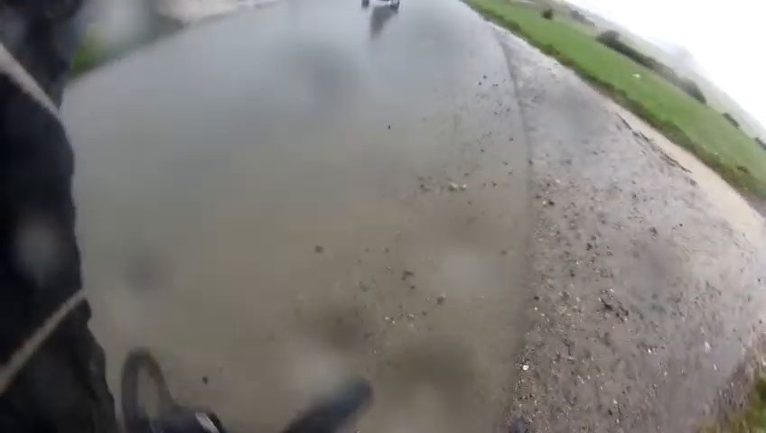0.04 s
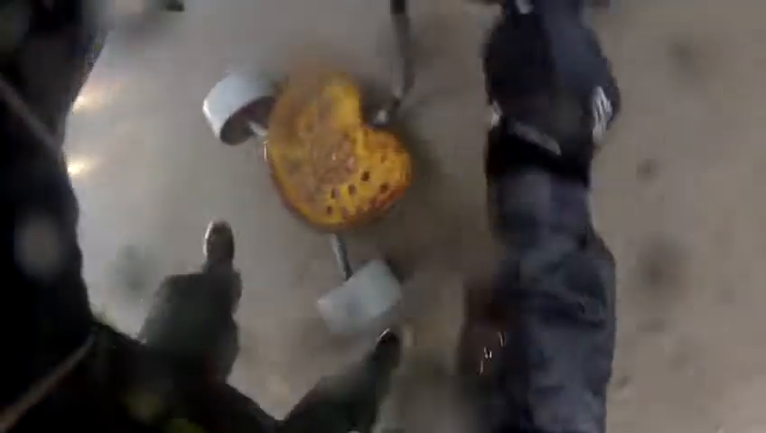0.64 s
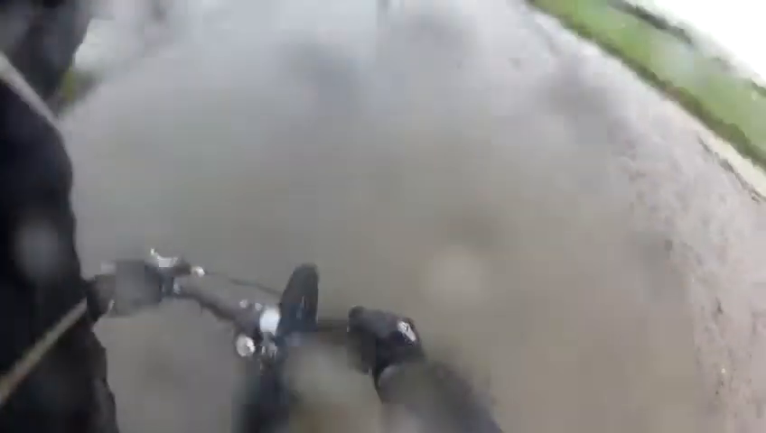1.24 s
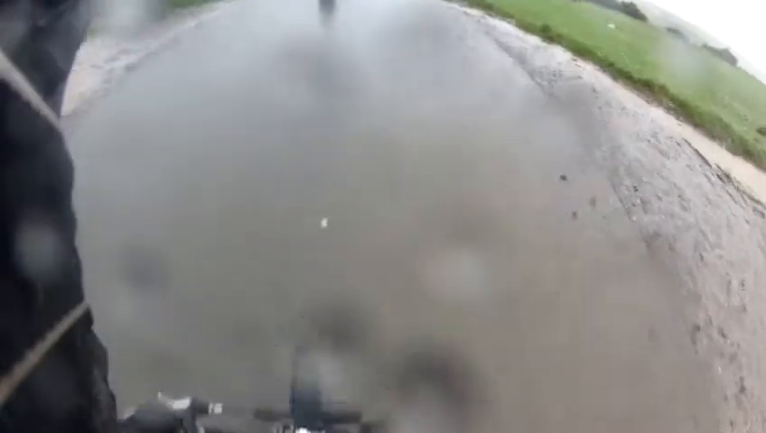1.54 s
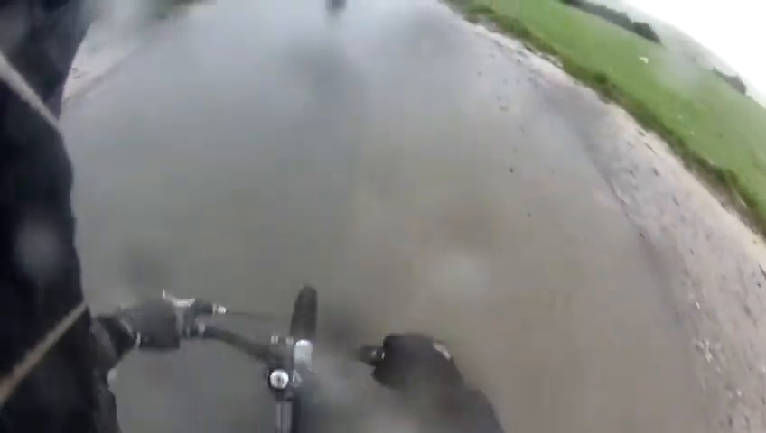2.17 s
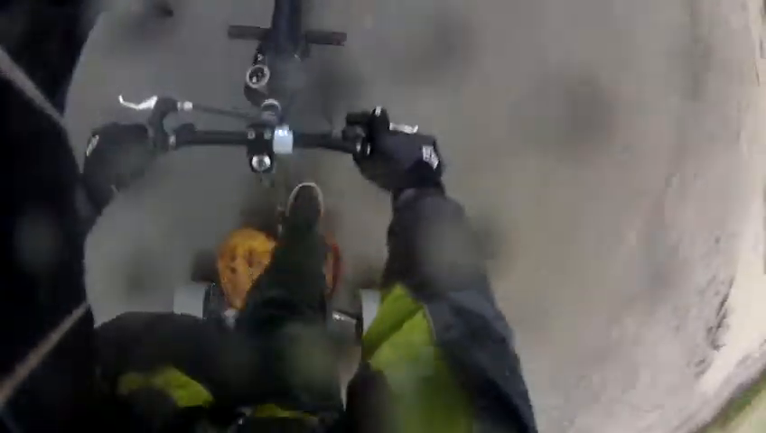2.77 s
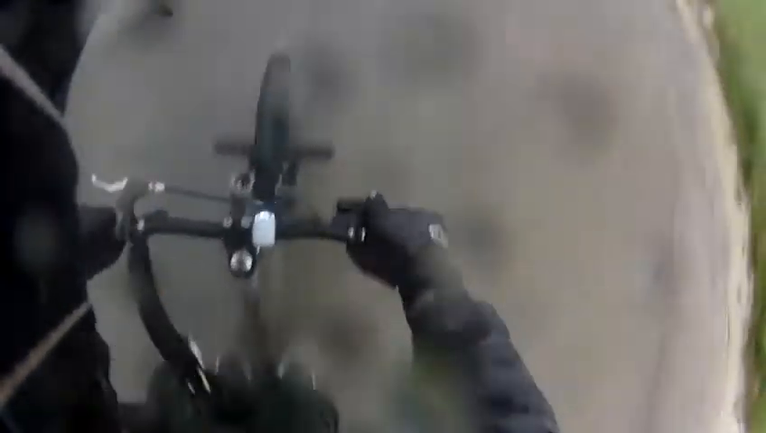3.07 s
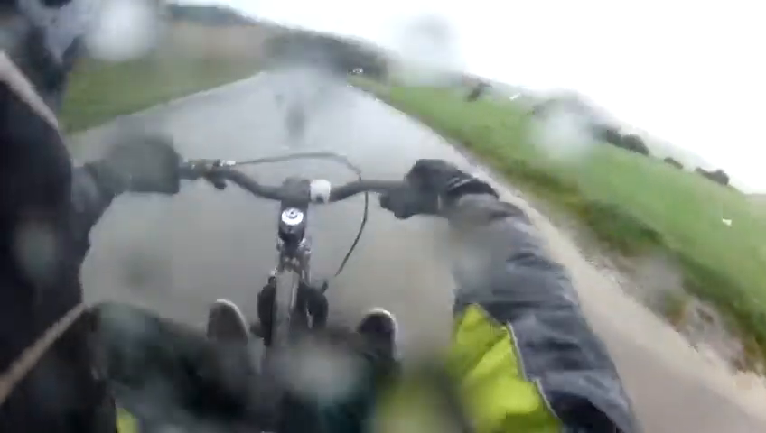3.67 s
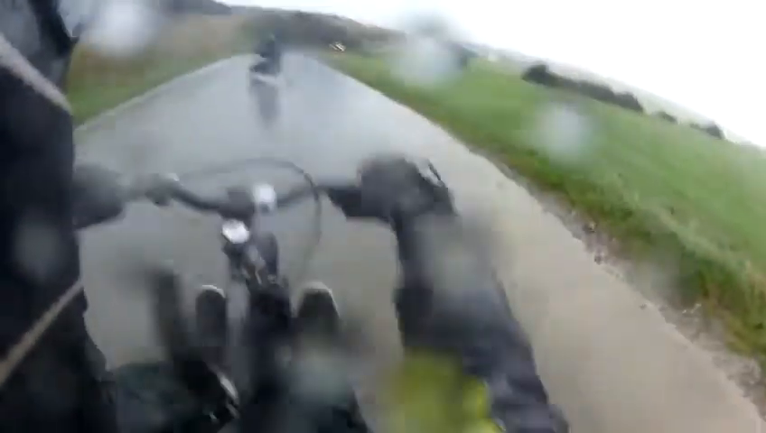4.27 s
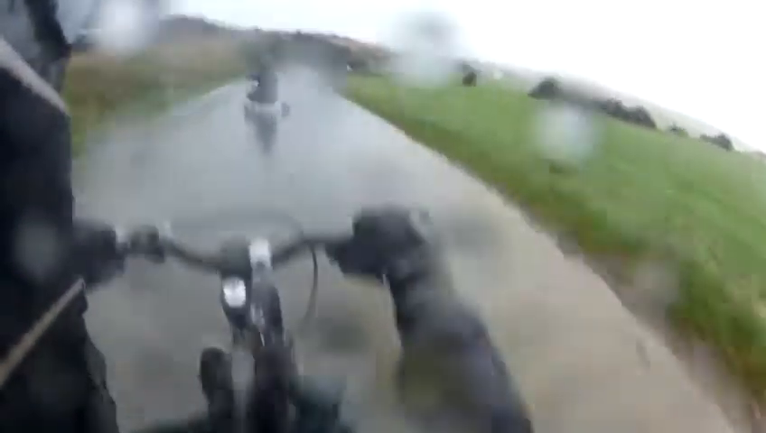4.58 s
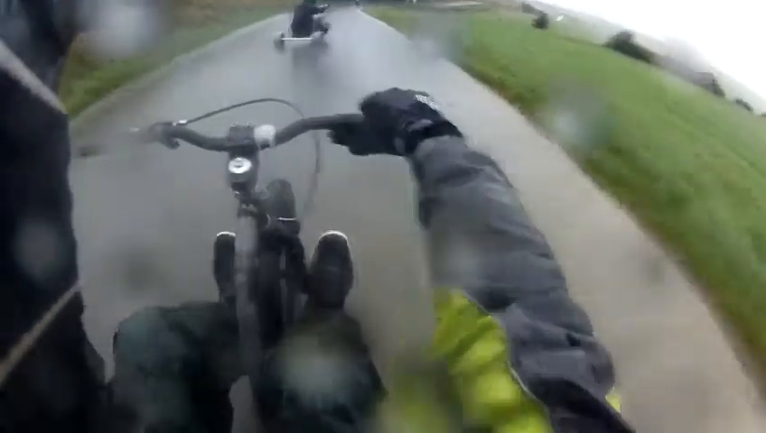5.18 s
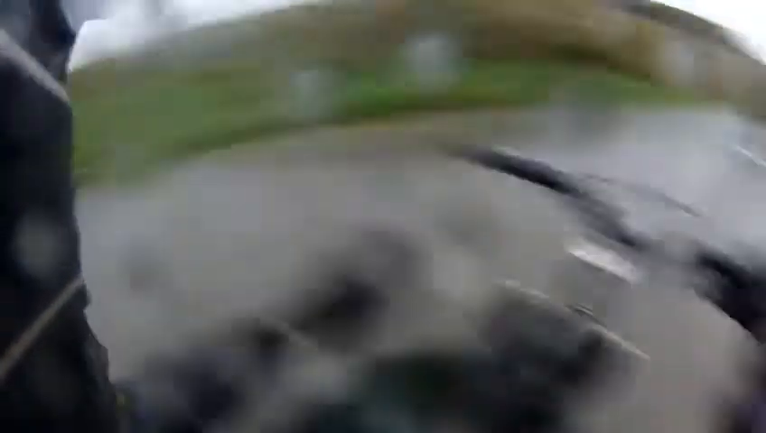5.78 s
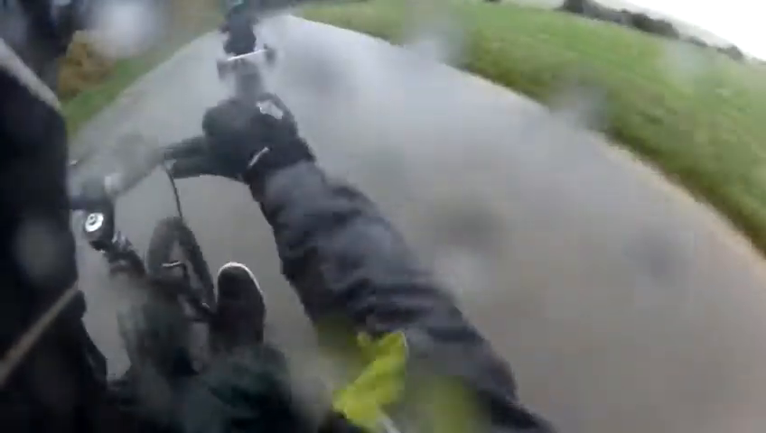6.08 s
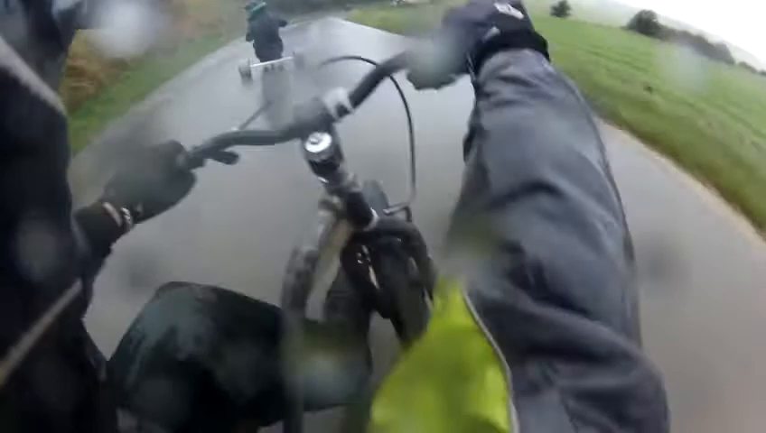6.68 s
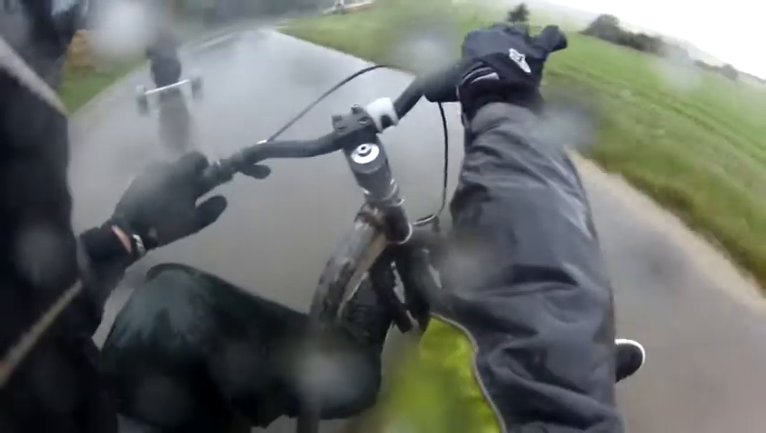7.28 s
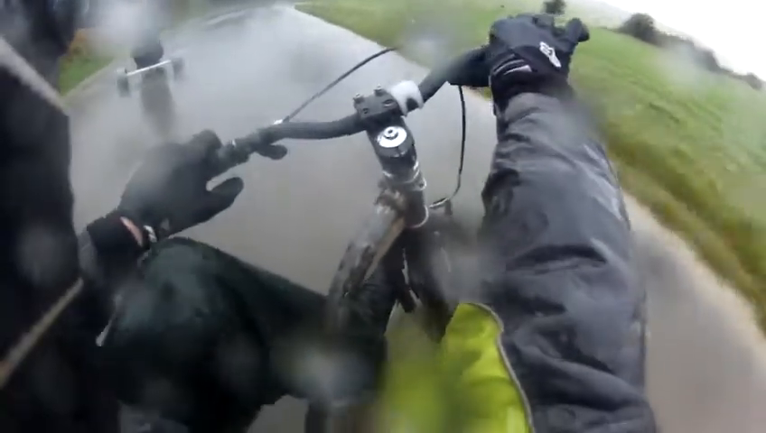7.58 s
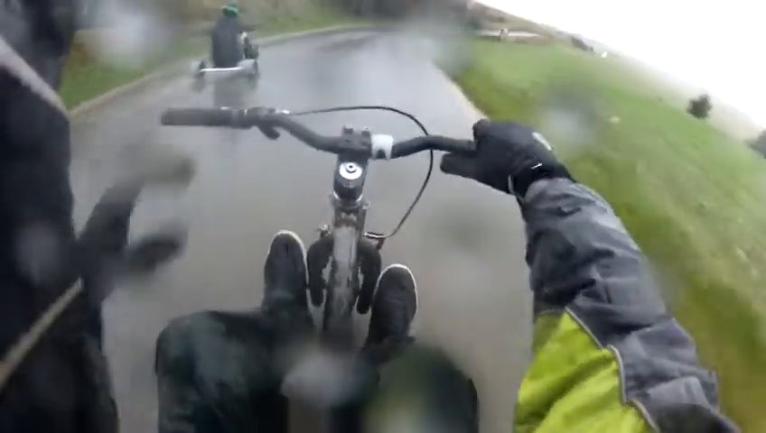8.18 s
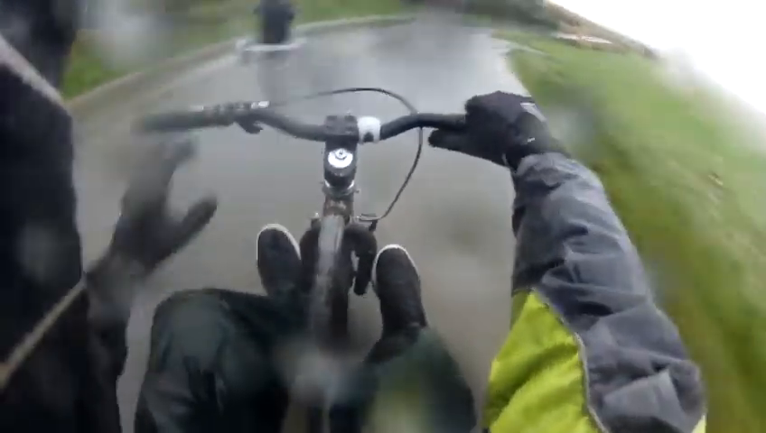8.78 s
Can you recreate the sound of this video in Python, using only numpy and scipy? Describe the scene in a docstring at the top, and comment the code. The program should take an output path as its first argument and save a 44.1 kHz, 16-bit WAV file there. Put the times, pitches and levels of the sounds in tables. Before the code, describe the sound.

A drift trike coasts on wet asphalt, heard from a camera worn by the rider. A quiet, uneven wheel rumble, low wind buffeting and light tyre hiss run throughout, with faint pattering drops. At about 0.4 seconds the wet camera case squeaks, then gives a sharp click and bump. Spray brightens briefly, a rain jacket rustles near 1 second, and another squeak comes at 1.2, followed by small clicks until 2. Around 3.8 seconds squeaks and bumps surround the loudest click. The wheels drum over a rough patch just after 4. A sharp cluster of clicks lands at about 5.5 seconds, with wind gusts from 5.3 to 6. From 6.3 to 7.8 the rear wheels slide, throwing a brighter hiss of spray. After 8 seconds come another gust, a soft bump and several short jacket rustles as the trike rolls on.

```python
"""Wind buffets the microphone over wheels drumming and hissing on wet asphalt: a drift trike coasting,
heard from the seat, through a camera worn by the rider in a waterproof case.
Just below, the tyres tear the water film and throw brighter spray when the rear wheels slide.
Right at the microphone, as the rider shifts, the wet case clicks, bumps and squeaks against mount and
clothing, and a rain jacket rustles. Under it all lie the camera's own faint hiss and whine."""
import sys
import numpy as np
from scipy import signal
from scipy.fft import rfft, irfft, next_fast_len
from scipy.io import wavfile

SR = 44100
rng = np.random.default_rng(int(sys.argv[2]) if len(sys.argv) > 2 else 0)


def waveform_to_disk(signal):
    """Save audio, clipped to [-1, 1], as 16-bit WAV at the path in sys.argv[1]."""
    frames = np.transpose(np.atleast_2d(signal))
    scaled = np.clip(frames, -1, 1) * 32767
    samples = np.round(scaled).astype(np.int16)
    wavfile.write(sys.argv[1], SR, samples)


N = 398223
TIME = np.arange(N) / SR
CUTOFF_HZ = 15500


def from_db(db):
    """Decibels to gain."""
    return 10 ** (np.asarray(db) / 20)


def rms_one(x):
    """Scale to unit rms."""
    return x / np.sqrt(np.mean(x ** 2) + 1e-20)


def in_time(rows):
    """A curve of (time, value) rows at every sample."""
    return np.interp(TIME, *np.transpose(rows))


def add(out, s, sound):
    """Mix a short sound in at time s."""
    i = max(round(s * SR), 0)
    out[i:i + len(sound)] += sound[:N - i]


def envelope(t, length_s, attack_s, release_s):
    """Rise, hold and fall, as a gain."""
    return np.clip(np.minimum(t / attack_s, (length_s - t) / release_s), 0, 1)


def swell(s, half_width_s):
    """A smooth rise and fall around time s, as a gain."""
    return np.exp(-.5 * np.minimum(((TIME - s) / half_width_s) ** 2, 100))


def drift(rate, size=N):
    """Smooth chance with spread 1 that changes about rate times a second."""
    padded = next_fast_len(size)
    hz = np.fft.rfftfreq(padded, 1 / SR)
    slow = irfft(rfft(rng.standard_normal(padded)) / (1 + (hz / rate) ** 2))
    return rms_one(np.resize(slow, size))


def coloured(x, spectrum):
    """Give x a spectrum that falls 20 dB an octave beyond its ends; rms 1."""
    hz, db = np.transpose(spectrum)
    size = next_fast_len(len(x), True)
    octave, points = np.log2(np.fft.rfftfreq(size, 1 / SR) + 1), np.log2(hz)
    beyond = np.abs(octave - np.clip(octave, points[0], points[-1]))
    gain = from_db(np.interp(octave, points, db) - 20 * beyond)
    return rms_one(irfft(rfft(x, size) * gain, size)[:len(x)])


def grains(per_s, spread_db):
    """Tiny impacts at random times, a few much larger than the rest."""
    sizes = from_db(spread_db * np.minimum(rng.exponential(1, N), 4))
    signs = rng.choice([-1, 1], N)
    return rms_one(sizes * signs * (rng.random(N) < per_s / SR))


def ring(x, hz, t60):
    """A unit click sets a sine of height 1 ringing."""
    r, w = from_db(-60 / (t60 * SR)), 2 * np.pi * hz / SR
    return signal.lfilter([0, np.sin(w)], [1, -2 * r * np.cos(w), r * r], x + 1e-18)


def soften(x, hz):
    """A yielding contact passes little above hz."""
    return signal.sosfilt(signal.butter(2, min(hz, SR / 3), fs=SR, output="sos"), x)


# Headwind on the case, right at the microphone: t/s, relative level/dB
HEADWIND_LEVEL = [(0.0, -56), (1.16, -50), (1.46, -61), (3.49, -64.5), (3.9, -50.5), (4.37, -59),
                  (5.1, -65), (5.31, -54), (6.04, -63), (6.28, -69), (6.99, -59), (7.92, -67),
                  (8.57, -54.5), (9.03, -52)]
# Single gusts on the case: t/s, level/dB
WIND_GUSTS = [(2.22, -50), (2.56, -47.5), (2.95, -48.5), (4.36, -50), (4.86, -51.5), (5.27, -43),
              (5.75, -43.5), (5.92, -42.5), (8.08, -52), (8.38, -41)]
# Wind as heard inside the case: f/Hz, relative level/dB
WIND_SPECTRUM = [(15, 3.5), (35, 0), (70, -11), (110, -10), (200, -31.5)]


def wind(jolts, gain_db, gust_half_width_s):
    """Lumpy air pushes on the case, steadily and in gusts."""
    gusts = sum(from_db(db) * swell(s, gust_half_width_s) for s, db in WIND_GUSTS)
    level = np.hypot(from_db(in_time(HEADWIND_LEVEL) + gain_db), gusts)
    return level * from_db(3.6 * jolts) * coloured(rng.standard_normal(N), WIND_SPECTRUM)


# Wheels on the asphalt, just below the microphone: t/s, relative level/dB
RUMBLE_LEVEL = [(0.0, -61), (0.45, -50.5), (0.85, -46.5), (1.48, -63), (2.11, -54), (2.64, -62),
                (3.22, -59.5), (3.77, -56), (3.92, -49.5), (4.37, -54), (4.53, -48.5), (5.03, -53),
                (5.31, -44.5), (5.71, -57.5), (6.79, -58), (7.04, -50), (7.55, -60.5), (9.03, -46)]
# Rough patches passing under the trike: t/s, half width/s, level/dB
ROUGH_PATCHES = [(0.88, 0.063, -47), (1.97, 0.021, -46), (2.199, 0.053, -43.5), (4.15, 0.034, -36.5),
                 (4.65, 0.032, -46), (7.07, .07, -45), (7.5, 0.04, -50), (8.3, 0.1, -49)]
# The hollow wheels, heard from the seat: f/Hz, relative level/dB
WHEEL_SPECTRUM = [(60, -19), (120, -7), (170, -7), (245, 0.5), (310, -7), (420, -16.5), (600, -25.5),
                  (900, -39.5), (1500, -38)]


def wheel_rumble(jolts, gain_db):
    """Asphalt drums in the hollow wheels, harder over rough patches."""
    patches = sum(from_db(db) * swell(s, half_width_s) for s, half_width_s, db in ROUGH_PATCHES)
    level = np.hypot(from_db(in_time(RUMBLE_LEVEL) + gain_db), patches)
    return level * from_db(3.7 * jolts) * coloured(rng.standard_normal(N), WHEEL_SPECTRUM)


# Water under the tyres, down at road level: t/s, relative level/dB
WATER_LEVEL = [(0.0, -70.5), (0.3, -67), (0.45, -62), (1.11, -56), (1.56, -73), (2.26, -64.5),
               (2.86, -66.5), (3.02, -61), (3.52, -63), (4.05, -60.5), (5.71, -57.5), (6.26, -60.5),
               (6.54, -53.5), (7.29, -54.5), (7.92, -56), (8.3, -53), (8.7, -55), (9.03, -53.5)]
# Rear wheels sliding, close behind the rider: start/s, end/s, extra spray/dB
REAR_SLIDES = [(0.548, 1.2, 4), (6.267, 7.75, 5.5)]
# Tyre hiss, heard from the seat: f/Hz, relative level/dB
TYRE_SPECTRUM = [(700, -17.5), (1250, -13), (1600, -6.5), (1900, 1.5), (2100, 0), (2550, 2), (2900, -2),
                 (3400, -0.5), (3900, -5), (4600, -19.5), (6000, -29)]
# Fine spray off the wheels: f/Hz, relative level/dB
SPRAY_SPECTRUM = [(3200, -10), (4100, -7.5), (4600, -6), (5050, 0.5), (5300, -4), (5700, 4), (6500, -5),
                  (7200, -2), (8000, -5), (8800, -17.5), (11000, -22.5), (15000, -33)]


def wet_tyres(hiss_gain_db, spray_gain_db, slide_fade_s):
    """The water film tears and fine spray flies; a slide lifts the spray far more than the hiss."""
    water_db = in_time(WATER_LEVEL)
    slide_db = sum(db * envelope(TIME - start, end - start, slide_fade_s, slide_fade_s)
                   for start, end, db in REAR_SLIDES)
    puddles = drift(25)
    hiss_db = water_db + hiss_gain_db + .17 * slide_db + .94 * puddles
    spray_db = water_db + spray_gain_db + slide_db + 1.4 * puddles
    hiss = from_db(hiss_db) * coloured(rng.standard_normal(N), TYRE_SPECTRUM)
    spray = from_db(spray_db) * coloured(grains(4000, spread_db=3), SPRAY_SPECTRUM)
    return hiss + spray


# Jacket fabric beside the microphone, under drops or creasing: f/Hz, relative level/dB
JACKET_SPECTRUM = [(800, -26), (1800, -3.5), (2600, -2), (3400, 4.5), (4600, -11.5), (6200, -6),
                   (8000, -14), (10000, -32.5), (15000, -36)]


def drops(level_db, decay_s):
    """Drops patter on the rider, each a brief splatter in one of four pitch bands."""
    patter = np.zeros(N)
    for hz in np.geomspace(3400, 7600, num=4):
        hits = np.abs(grains(12, spread_db=2.2)) + 1e-18
        splats = signal.lfilter([1], [1, -np.exp(-1 / (decay_s * SR))], hits)
        patter += signal.lfilter(*signal.iirpeak(hz, 1.5, fs=SR), splats * rng.standard_normal(N))
    # rain keeps falling at any speed, so the patter follows the tyres only half way
    water_db = in_time(WATER_LEVEL)
    return from_db(level_db + .5 * (water_db - water_db.mean())) * coloured(patter, JACKET_SPECTRUM)


# Noise floor behind the microphone: f/Hz, relative level/dB
FLOOR_SPECTRUM = [(300, 7.5), (2000, 2.5), (9000, -2.5), (12000, -7), (15500, -8)]


def electronics(hiss_db, whine_db, whine_hz):
    """The camera's own faint hiss and thin whine."""
    hiss = from_db(hiss_db) * coloured(rng.standard_normal(N), FLOOR_SPECTRUM)
    whine = from_db(whine_db) * rms_one(np.sin(2 * np.pi * whine_hz * TIME))
    return hiss + whine


# Modes of the case around the microphone: f/Hz, relative level/dB, t60/s
CASE_MODES = [(1050, -10.5, 0.013), (1890, -9, 0.013), (2375, -4, 0.0067), (3000, -2, 0.0095),
              (3550, 0, 0.0035), (4260, -5, 0.0064), (5710, -5, 0.0016), (6790, -7, 0.0024),
              (9040, -19.5, 0.0052), (12500, -24, 0.0024)]


def case_ring(force, contact_hz, sharpness):
    """The plastic case rings; the contact's speed decides which modes are driven most."""
    push = signal.lfilter(*signal.iirpeak(min(contact_hz, SR / 3), sharpness, fs=SR), force)
    return sum(from_db(db) * ring(push, hz, t60) * (-1) ** k
               for k, (hz, db, t60) in enumerate(CASE_MODES))


# Slips and snaps of the mount, right at the microphone: t/s, peak level/dB, brightness f/Hz
MOUNT_CLICKS = [(0.2735, -33, 1740), (0.298, -32, 3660), (0.488, -8, 5840), (0.4941, -16.5, 2000),
                (1.3556, -29.5, 2450), (1.4250, -32, 7500), (1.4585, -38.5, 2780), (1.5216, -21, 2360),
                (1.9035, -19.5, 2800), (3.8238, -0.5, 6960), (3.8259, -11.5, 620), (4.1012, -17, 7580),
                (4.6359, -31.5, 6400), (4.9219, -31.5, 5560), (5.4455, -9, 1900), (5.4467, -17, 2190),
                (5.4484, -8, 2200), (5.4501, -17.5, 1140), (5.6432, -31, 5100), (5.755, -29, 1710),
                (5.762, -34, 1130)]


def clicks(sharpness, cycles):
    """Each slip is a crack of a few cycles and the short ring of the case; slow slips are dull."""
    out, impulse = np.zeros(N), signal.unit_impulse(SR // 40)
    for s, db, hz in MOUNT_CLICKS:
        crack = ring(impulse, hz, cycles / hz)
        body = case_ring(impulse, hz, sharpness)
        click = soften(crack + body / np.abs(body).max(), 5.7 * hz)
        add(out, s, from_db(db) * click / np.abs(click).max())
    return out


# Soft bumps, carried through the case to the microphone: t/s, peak level/dB, f/Hz
CASE_BUMPS = [(0.297, -32, 55.5), (0.375, -23, 109.7), (0.395, -24.5, 80), (0.459, -23, 75),
              (0.488, -12, 82.3), (1.167, -27.5, 82), (1.273, -28.5, 129.4), (1.295, -25.5, 44.6),
              (3.724, -24, 64), (3.784, -23.5, 89), (3.821, -11.5, 74.4), (3.865, -16.5, 77.5),
              (5.45, -24, 54.5), (5.483, -26, 103.6), (5.762, -29.5, 100), (5.882, -32, 65),
              (8.346, -29, 84)]


def bumps(rise_s, cycles, hollow_hz, hollow_t60, hollow_db):
    """A soft push rocks the case for a few slow cycles, with a short hollow knock on top."""
    out, t = np.zeros(N), TIME[:SR // 4]
    knock = from_db(hollow_db) * ring(signal.unit_impulse(len(t)), hollow_hz, hollow_t60)
    onset = 1 - np.exp(-(t / rise_s) ** 2)
    for s, db, hz in CASE_BUMPS:
        rock = np.sin(2 * np.pi * hz * t) * from_db(-60 * t * hz / cycles)
        bump = (rock + knock) * onset
        add(out, s, from_db(db) * bump / np.abs(bump).max())
    return out


# The wet case rubbing in its mount, right at the microphone:
# t/s, length/s, slowing time/s, slip rate at full speed/Hz, relative level/dB
MOUNT_RUBS = [(.3615, .027, .004, 2300, -26), (.3955, .053, .024, 3200, -23), (1.2, .073, .04, 1980, -19),
              (3.7345, .054, .018, 2150, -17.5), (3.825, .012, .012, 1900, -19),
              (3.8415, .025, .02, 2200, -24)]


def judders(uneven_db, contact_hz, soft_hz, direct_db):
    """A rub speeds up, then slows to a stop; the rate of its slips follows the speed."""
    out = np.zeros(N)
    for s, length_s, slowing_s, top_hz, db in MOUNT_RUBS:
        t = TIME[:int(length_s * SR)]
        speeding_up = np.interp(t, [0, .014], [.65, 1])
        slowing_down = np.interp(length_s - t, [0, slowing_s], [.27, 1])
        slip_hz = top_hz * np.minimum(speeding_up, slowing_down)
        phase = 2 * np.pi * np.cumsum(slip_hz * from_db(uneven_db * drift(800, len(t)))) / SR
        # stress builds and lets go once a slip: a rounded sawtooth, whose jumps knock on the case
        sawtooth = sum(np.sin(k * phase) / k * (k * slip_hz < CUTOFF_HZ) for k in range(1, 20))
        stress = soften(sawtooth, soft_hz)
        knocks = case_ring(np.gradient(stress), contact_hz, sharpness=.15)
        judder = rms_one(rms_one(knocks) + from_db(direct_db) * rms_one(stress))
        shape = envelope(t, length_s, attack_s=.12 * length_s, release_s=.0021)
        add(out, s, from_db(db) * shape * judder)
    return out


# The mount gripping the case tightly, just as close:
# t/s, length/s, attack/s, first f/Hz, last f/Hz, relative level/dB
GRIP_SQUEALS = [(.362, .019, .006, 3400, 3150, -19), (.379, .0095, .007, 3050, 3550, -11),
                (.3958, .0095, .0015, 3330, 3500, -7.5), (.4045, .022, .007, 3450, 3080, -8.5),
                (.426, .013, .002, 3150, 3330, -13), (1.209, .023, .016, 2950, 3680, -7.5),
                (1.25, .012, .006, 2750, 2150, -17), (3.748, .029, .003, 2720, 2130, -6),
                (3.827, .009, .004, 2850, 2350, -11.5), (3.8435, .008, .003, 3250, 2980, -8.5)]
SQUEAL_RELEASE = .3   # share of a squeal's length


def squeals(second_db, third_db, flutter_db, rasp_db, rasp_hz):
    """A tight grip sings one gliding, fluttering tone with two overtones and a trace of friction noise."""
    out = np.zeros(N)
    for s, length_s, attack_s, first_hz, last_hz, db in GRIP_SQUEALS:
        t = TIME[:int(length_s * SR)]
        waver = 1 + .01 * drift(550, len(t)) + .015 * drift(90, len(t))
        phase = 2 * np.pi * np.cumsum(np.linspace(first_hz, last_hz, len(t)) * waver) / SR
        overtones = from_db(second_db) * np.sin(2 * phase) + from_db(third_db) * np.sin(3 * phase)
        rasp = from_db(rasp_db) * soften(rng.standard_normal(len(t)), rasp_hz)
        flutter = from_db(flutter_db * drift(170, len(t)))
        tone = rms_one((np.sin(phase) + overtones + rasp) * flutter)
        add(out, s, from_db(db) * envelope(t, length_s, attack_s, SQUEAL_RELEASE * length_s) * tone)
    return out


def squeaks(judder_gain_db, squeal_gain_db, grip_damps_db):
    """The wet case rubs: the judder of separate slips gives way to the squeal of a tight grip."""
    grip = sum(envelope(TIME - s, length_s, attack_s, SQUEAL_RELEASE * length_s)
               for s, length_s, attack_s, *_ in GRIP_SQUEALS)
    judder = judders(uneven_db=1.15, contact_hz=2600, soft_hz=7000, direct_db=-10)
    squeal = squeals(second_db=-18, third_db=-34.5, flutter_db=2.2, rasp_db=-32, rasp_hz=8950)
    return from_db(judder_gain_db - grip_damps_db * grip) * judder + from_db(squeal_gain_db) * squeal


# The rain jacket creasing beside the microphone: t/s, relative level/dB
JACKET_RUSTLES = [(0.9266, -36.5), (0.955, -23), (1.3728, -39), (2.1206, -39.5), (2.504, -44),
                  (3.348, -43.5), (3.9718, -36.5), (4.4376, -33.5), (4.81, -29), (5.5187, -36),
                  (7.6722, -36), (8.166, -33), (8.182, -30), (8.3393, -33.5), (8.587, -35.5), (8.871, -27),
                  (8.9434, -34.5)]


def rustles(rise_s, snap_s, snap_db, gain_db):
    """Folds of stiff wet fabric give way, each in a small snap and clump of crackle."""
    level, t = np.zeros(N), TIME[:SR // 8]
    clump = t / rise_s * np.exp(1 - t / rise_s)
    snap = from_db(snap_db) * t / snap_s * np.exp(1 - t / snap_s)
    for s, db in JACKET_RUSTLES:
        add(level, s, from_db(db + gain_db) * (clump + snap))
    return level * coloured(grains(6000, spread_db=1.5), JACKET_SPECTRUM)


def scene():
    """One microphone on the rider: road below, air ahead, case and jacket closest of all."""
    jolts = drift(28)   # rumble and wind shake together
    mix = wheel_rumble(jolts, gain_db=2)
    mix += wind(jolts, gain_db=3, gust_half_width_s=.046)
    mix += wet_tyres(hiss_gain_db=-.5, spray_gain_db=-10.5, slide_fade_s=.033)
    mix += drops(level_db=-62.5, decay_s=.004)
    mix += clicks(sharpness=2.1, cycles=2.2)
    mix += bumps(rise_s=.003, cycles=6.7, hollow_hz=253, hollow_t60=.11, hollow_db=-12.5)
    mix += squeaks(judder_gain_db=1, squeal_gain_db=-.63, grip_damps_db=6)
    mix += rustles(rise_s=.0019, snap_s=.0015, snap_db=-17, gain_db=-9.5)
    mix += electronics(hiss_db=-71, whine_db=-78.5, whine_hz=10519)
    return mix[None]


def record(dry):
    """The camera clips any peak past full scale and cuts the top treble."""
    low_pass = signal.ellip(10, .3, 80, CUTOFF_HZ, fs=SR, output="sos")
    return signal.sosfilt(low_pass, np.clip(dry, -1, 1))


dry = scene()
out = record(dry)
waveform_to_disk(out)
```